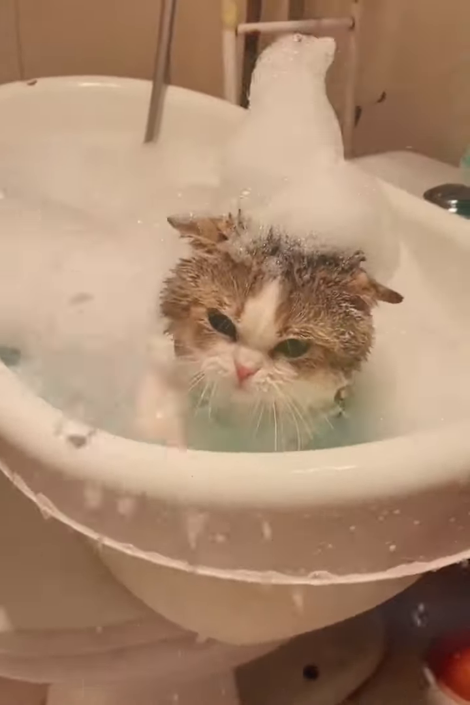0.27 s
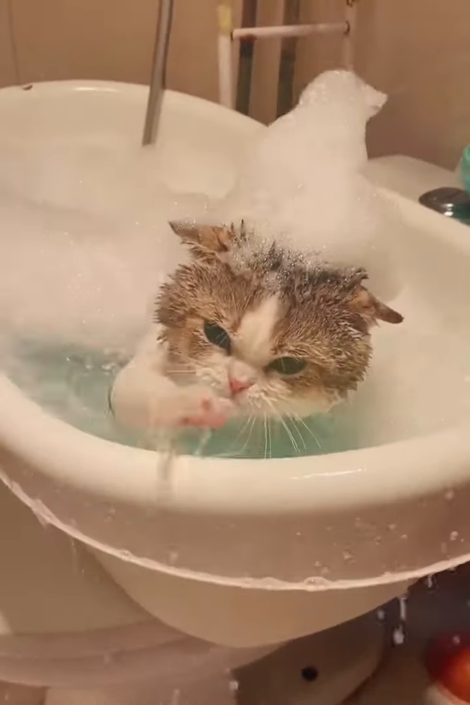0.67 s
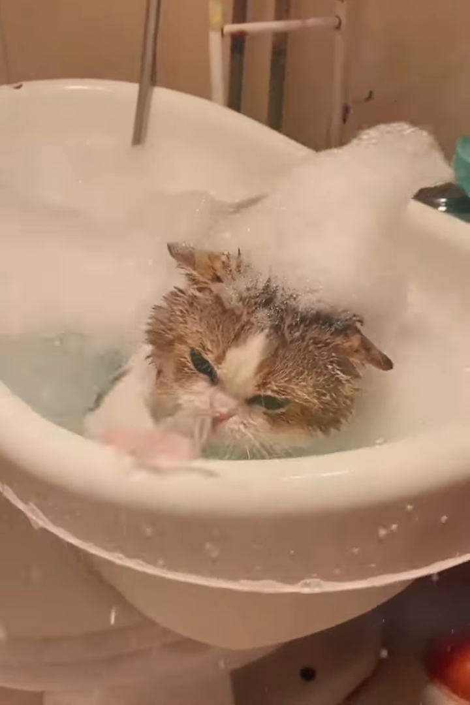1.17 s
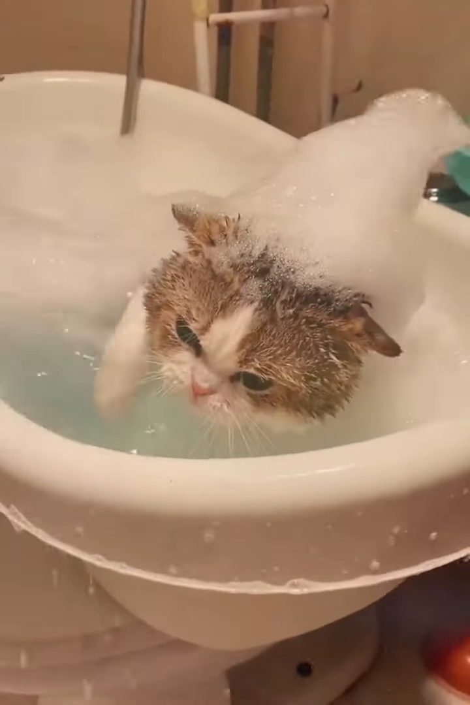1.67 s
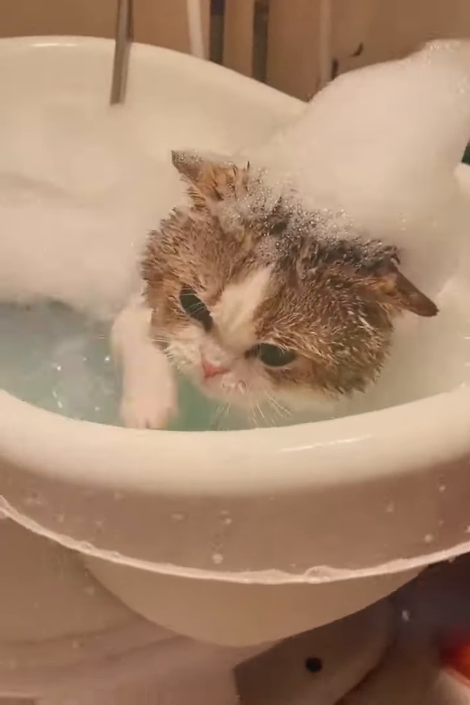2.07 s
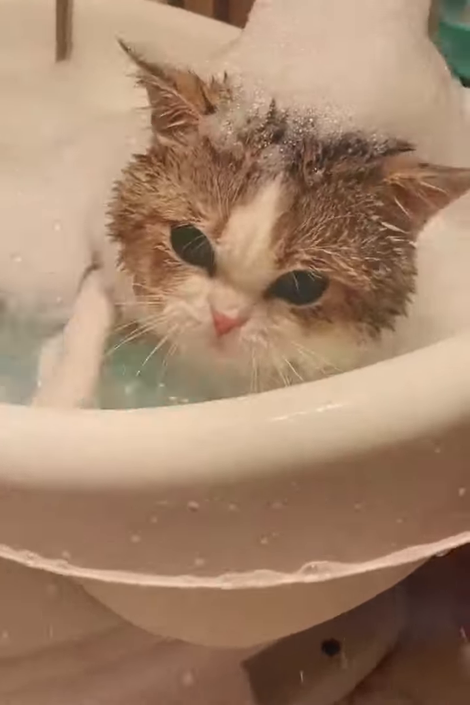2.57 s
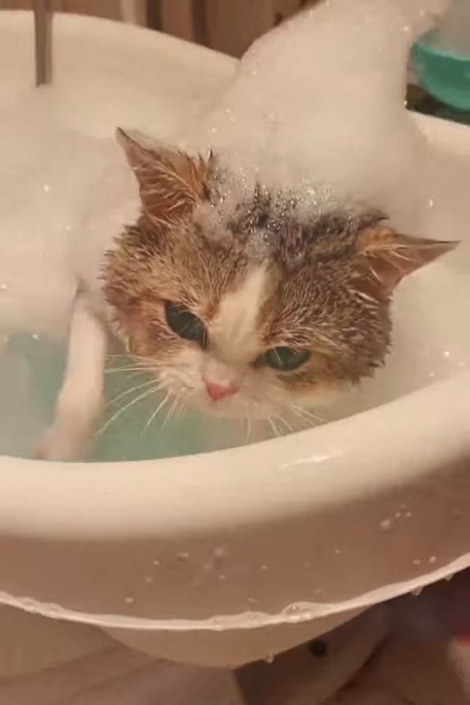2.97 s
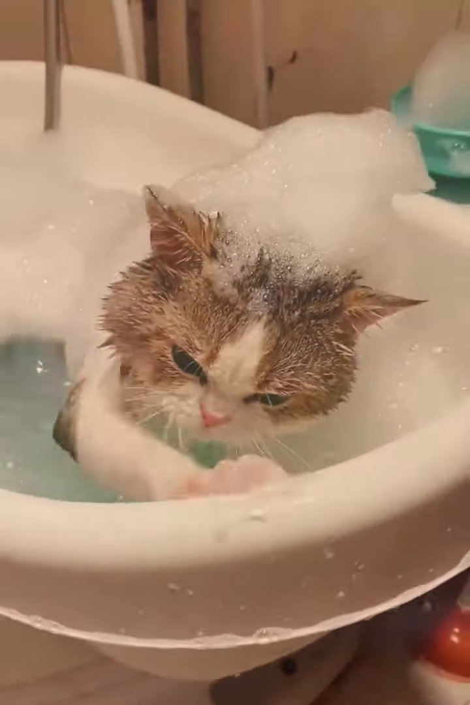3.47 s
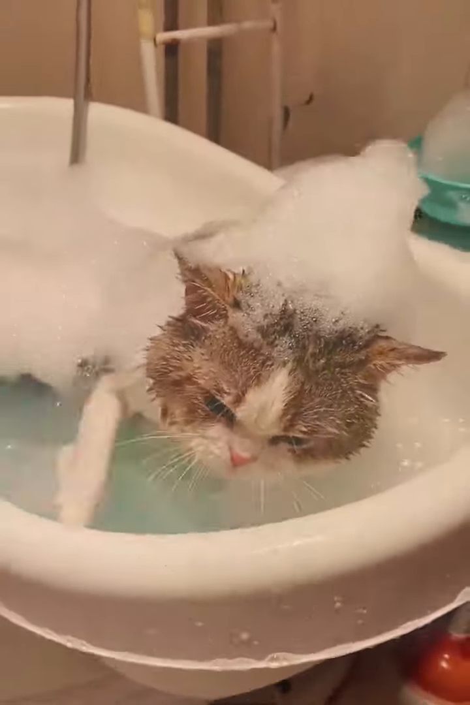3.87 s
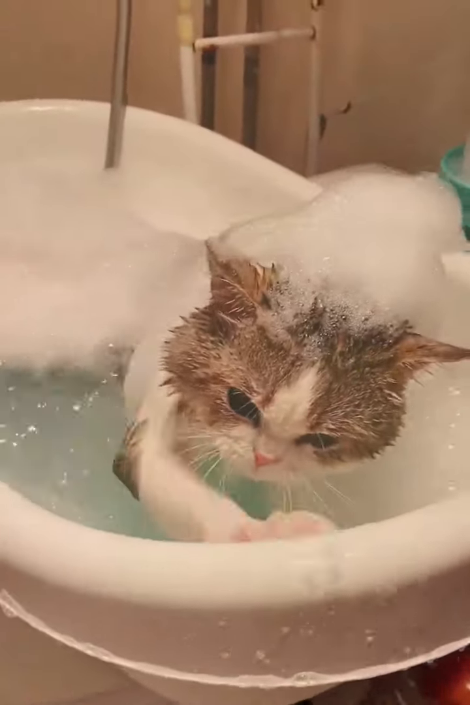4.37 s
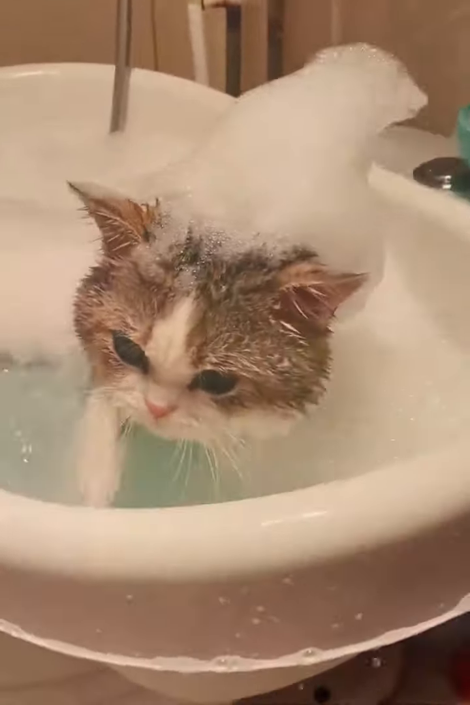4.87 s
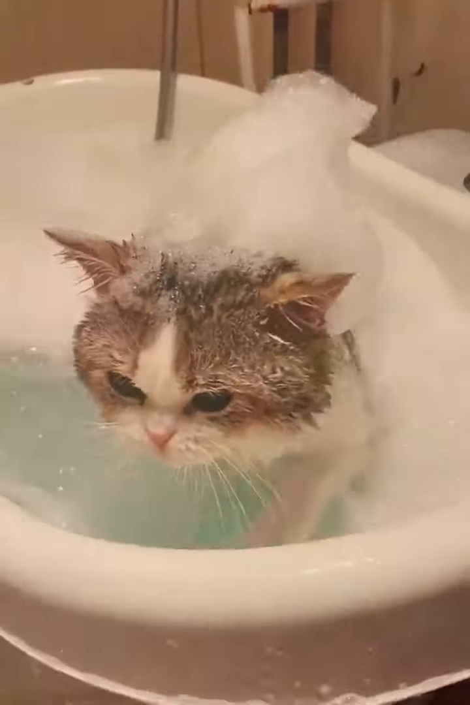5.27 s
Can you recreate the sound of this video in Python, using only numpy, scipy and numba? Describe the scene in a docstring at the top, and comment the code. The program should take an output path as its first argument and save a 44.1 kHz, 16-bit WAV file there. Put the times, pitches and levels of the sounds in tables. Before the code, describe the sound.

Close stereo phone sound of water being slapped in a basin: sharp wet pops, rounded gulps, churning small bubbles and brief hissy spray. The busiest, loudest splashing comes first, with a low thump against the wall. Gentler dabs, lapping and drips follow, then a livelier burst ends it. Short bright tile reflections and a low house hum surround it.

```python
"""A small animal paws at foamy water in a plastic basin in a tiled bathroom, a phone close by.
Hard slaps crowd the first 1.5 s, grow sparser and softer, then gather again from about 5 s.
Each slap rings trapped air, churns smaller bubbles and throws spray; surges drive the basin's modes.
Single bubbles ring, droplets tick on the rim and water laps between slaps, all over a low house hum
of shaped noise. The tiles return short decaying noise tails, partly alike in left and right."""
import sys
import numpy as np
from scipy import signal
from scipy.fft import rfft, irfft, next_fast_len
from scipy.io import wavfile
from numba import njit

SR = 44100
rng = np.random.default_rng(int(sys.argv[2]) if len(sys.argv) > 2 else 0)


def unload_audio(sound):
    """Save the sound as a 16-bit wav file, at the path given as the first command line argument."""
    columns = np.transpose(np.atleast_2d(sound))
    # keep every value between -1 and 1, then stretch to whole-number steps
    steps = np.round(np.clip(columns, -1, 1) * 32767)
    wavfile.write(sys.argv[1], SR, steps.astype(np.int16))


N = 243990
TIME = np.arange(N) / SR
FAST = next_fast_len(N)
SPOTS = 3  # places in the basin where the paw lands, each with its own echoes
FADE_S = 0.22  # base time that sets the fades of spray and bubble clusters


def undb(db):
    """Level law: 20 dB is a factor of ten in amplitude."""
    return 10 ** (np.asarray(db) / 20)


def unit(x):
    """Normalisation to unit rms."""
    return x / np.sqrt(np.mean(x ** 2))


def along(table, size):
    """Interpolation over log frequency: a (frequency [Hz], value) table read at each transform bin."""
    hz, value = np.transpose(table)
    return np.interp(np.log(np.fft.rfftfreq(size, 1 / SR) + 1), np.log(hz), value)


def coloured(x, table):
    """Spectral shaping: the spectrum is weighted by a (frequency [Hz], level [dB]) table; rms 1."""
    spectrum = rfft(x, FAST) * undb(along(table, FAST))
    return unit(irfft(spectrum, FAST)[:N])


@njit
def ring(start, hz, cycles, size, glide):
    """Bubble resonance: a swell over 1.5 cycles, a decay of 26 dB in `cycles`, and a gliding pitch."""
    out = np.zeros(N)
    for k in range(len(start)):
        span = cycles[k] * SR / hz[k]
        phase = 0.
        for i in range(min(int(2 * span), N - start[k])):
            phase += min(2 * np.pi * hz[k] * (1 + glide * i / span) / SR, 2.8)
            swell = np.sin(min(phase / 6, np.pi / 2)) ** 2
            out[start[k] + i] += size[k] * swell * np.exp(-3 * i / span) * np.sin(phase)
    return out


def swarm(per_s, lo_hz, hi_hz, cycles, scatter_db, glide):
    """Random superposition: bubbles at random times, a few loud among many faint; rms 1."""
    when, pitch, rank, length = rng.random((int(per_s * N / SR), 4)).T
    start = (when * N).astype(np.int64)
    hz = lo_hz * (hi_hz / lo_hz) ** pitch
    size = undb(-scatter_db * np.log(1 - .99 * rank))
    return unit(ring(start, hz, cycles * (.5 + length), size, glide))


def burst(s, hz, db, t60_s, cycles, spread, scatter_db, count, glide=0.067, rise_s=1e-4):
    """Decaying cluster: each blow frees bubbles of like pitch, on average ever fainter; one row a spot."""
    u = rng.standard_normal((len(s), count, 3))
    jitter = np.tanh(u[..., 0]) ** 2 * (count > 1)
    late = .5 * t60_s * (np.arange(count) + jitter) / count
    level_db = db[:, None] + scatter_db * np.clip(u[..., 1], -2, 2) - 60 * late / t60_s
    size = undb(level_db) * np.tanh((late + 0.0029) / rise_s)
    pitch = np.clip(hz[:, None] * np.exp(spread * u[..., 2]), 100, 15000)
    start = ((s[:, None] + late) * SR).astype(np.int64)
    spots = []
    for k in range(SPOTS):  # blows are dealt to the spots in turn
        here = slice(k, None, SPOTS)
        spot_hz = pitch[here].ravel()
        lengths = np.full(spot_hz.size, cycles)
        spots.append(ring(start[here].ravel(), spot_hz, lengths, size[here].ravel(), glide))
    return np.array(spots)


def stir(s, db, rise_s, t60_s):
    """Energy summation: the water's motion rises and fades after every blow, added in power."""
    power, t = np.zeros(N + SR), TIME[:SR // 2]
    shape = (1 - np.exp(-t / rise_s)) ** 2 * np.exp(-2 * np.log(1000) * t / t60_s)
    for start, level in zip((s * SR).astype(int), undb(db)):
        power[start:start + len(t)] += level ** 2 * shape
    return np.sqrt(power[:N])


# spectrum of the house hum: (frequency [Hz], relative level per Hz [dB])
HUM_SPECTRUM = [(25, -5), (45, 1.5), (72, 13.5), (100, 2), (135, 4.5), (190, -4.5), (218, -2.5), (242, 9),
                (268, 1), (320, 1.5), (380, -3.5), (525, -4), (620, -27), (900, -76), (2000, -60)]
HUM_DB = -44


def hum():
    """Stationary noise: a low house hum shaped by its spectrum."""
    return undb(HUM_DB) * coloured(rng.standard_normal(N), HUM_SPECTRUM)


# likeness of the echoes in left and right: (frequency [Hz], likeness [0-1])
ECHO_LIKENESS = [(150, 0.52), (300, 0.81), (600, 0.0051), (3000, 0.0078), (5500, 0.057), (7500, 1),
                 (10000, 0.73), (16000, 1)]
ROOM_T60_S, ROOM_TREBLE_T60_S = 0.15, 0.2
ROOM_GAP_S, ROOM_DB = 0.0007, 1.5  # build-up time of the tail; its relative level


def echoes(size):
    """Diffuse reverberation: noise tails off the tiles, the treble lasting longer, partly coherent."""
    t = TIME[:int(.4 * SR)]
    noise = rng.standard_normal((3, len(t)))
    dull = signal.sosfilt(signal.butter(2, 4000, fs=SR, output="sos"), noise)
    fade = np.exp(-np.log(1000) * t / ROOM_T60_S)
    treble_fade = np.exp(-np.log(1000) * t / ROOM_TREBLE_T60_S)
    grow = 1 - np.exp(-(t / ROOM_GAP_S) ** 2)
    tail = (dull * fade + (noise - dull) * treble_fade) * grow
    tails = rfft(tail * undb(ROOM_DB) / np.sqrt(np.sum(fade ** 2)), size)
    like = np.clip(along(ECHO_LIKENESS, size), 0, 1)
    return np.sqrt(like) * tails[0] + np.sqrt(1 - like) * tails[1:]  # shared part, own parts


# the water keeps moving after a slap: level against its churn and its spray; rise and t60
AFTERWASH_DB, AFTERSPRAY_DB, AFTERWASH_RISE_S, AFTERWASH_S = -12, -8.5, 0.018, 0.27
LAP_GULP_DB = -2  # large lapping bubbles against the small
# lapping between slaps: (time [s], bubble level [dB], spray level [dB])
LAPPING_LEVELS = [(0.0, -26, -27.5), (0.08, -46, -39.5), (0.31, -32, -34.5), (0.6, -38.5, -45.5),
                  (0.76, -54, -42), (0.98, -40, -34), (1.26, -34, -37.5), (1.499, -45.5, -39.5),
                  (1.86, -49.5, -49), (2.15, -50, -49), (2.54, -42.5, -47.5), (2.82, -53, -51),
                  (3.15, -52, -45.5), (3.5, -46.5, -47), (3.8, -46, -45.5), (4.001, -47.5, -48.5),
                  (4.4, -48, -49), (4.6, -41.5, -48), (4.73, -50.5, -45.5), (4.98, -47.5, -47),
                  (5.1, -36.5, -36), (5.19, -34, -43), (5.301, -47, -47), (5.53, -31.5, -36.5)]


def lapping():
    """Bubble superposition: large and small swarms follow the lapping and the wash after each slap."""
    when, bubbles_db, _ = np.transpose(LAPPING_LEVELS)
    s, churn_db = np.transpose(SLAP_EVENTS)[[0, 5]]
    between = undb(np.interp(TIME, when, bubbles_db))
    after = stir(s, churn_db + AFTERWASH_DB, AFTERWASH_RISE_S, AFTERWASH_S)
    large = undb(LAP_GULP_DB) * swarm(300, 266.5, 613.0, 2.4, 0.65, 0.26)
    small = swarm(1500, 726.0, 4830.0, 6.2, 4.0, 0.15)
    return np.hypot(between, after) * (large + small)


# spectrum of the spray: (frequency [Hz], relative level per Hz [dB])
SPRAY_SPECTRUM = [(600, -24), (2000, 6), (3200, -4), (5000, -1), (7500, -3), (11000, -2.5), (14000, -4),
                  (15600, -9), (17000, 0)]


def spray():
    """Many-droplet limit: fine droplets merge into hiss; larger ones crackle over it."""
    when, _, spray_db = np.transpose(LAPPING_LEVELS)
    s, thrown_db = np.transpose(SLAP_EVENTS)[[0, 8]]
    between = undb(np.interp(TIME, when, spray_db))
    after = stir(s, thrown_db + AFTERSPRAY_DB, AFTERWASH_RISE_S, AFTERWASH_S)
    thrown = stir(s, thrown_db, 0.00022, 0.57 * FADE_S)
    crackle = 0.75 * swarm(700, 2980.0, 13300.0, 1.73, 4.3, 0.24)
    drops = rng.standard_normal(N) + crackle
    hiss = coloured(drops, [(20, -60)] + list(SPRAY_SPECTRUM))
    return hiss * np.hypot(thrown, np.hypot(between, after))


UPPER_FROM_HZ = 150
# the wave front hits the wall once, then rumbles against it
SLAM_DB, SLAM_LAG_S, RUMBLE_DB = 28, 0.00994, -6.5
# modes of the plastic basin: (frequency [Hz], width [Hz], relative level [dB])
BASIN_MODES = [(70, 27, -11), (136.6, 12.6, 4.5), (158.6, 18.5, 0), (239, 31, -5)]
# surges against the basin wall: (time [s], relative level [dB], lift of the upper modes [dB])
WALL_SURGES = [(0.077, -30.5, 2), (0.155, -10, 0), (0.384, -22.5, 2.5), (0.544, -36.5, -5),
               (0.801, -28.5, 3), (0.945, -36, 2.5), (1.045, -28.5, -6), (1.283, -23.5, 7.5),
               (1.614, -38.5, 2), (2.01, -32, -3), (2.46, -44, 8), (2.65, -36.5, 0), (3.02, -30.5, -8),
               (3.348, -31, -4), (3.67, -29, -4), (3.95, -30, -2), (4.26, -31.5, -4), (4.56, -36.5, 1),
               (4.872, -28.5, -3), (5.04, -28, 6), (5.29, -34, -3), (5.37, -36, 3), (5.451, -35, 1)]


def basin():
    """Modal resonance: each surge drives the wall; where the wave lands sets the balance of modes."""
    s, db, lift_db = np.transpose(WALL_SURGES)
    hz, noise = np.fft.rfftfreq(FAST, 1 / SR), rng.standard_normal(N)
    slam_at = ((s + SLAM_LAG_S) * SR).astype(int)
    boom, response = 0, 0
    for mode_hz, width_hz, gain_db in BASIN_MODES:
        mode = undb(gain_db) / (1 + 2j * (hz - mode_hz) / width_hz) ** 2
        blow_db = db + lift_db * (mode_hz > UPPER_FROM_HZ)
        push = noise * stir(s, blow_db + RUMBLE_DB, 0.0166, 0.41)
        push[slam_at] += undb(blow_db + SLAM_DB)
        boom = boom + rfft(push, FAST) * mode
        response = response + mode
    return irfft(boom, FAST)[:N] / np.sqrt(np.mean(np.abs(response) ** 2))


TICK_SHARD_DB = 2.5  # each shard of a droplet against the whole
TICK_ECHO_DB = -4  # the rim is close to the phone
# droplets that tick on the rim: (time [s], relative level [dB], frequency [Hz])
RIM_TICKS = [(0.055, -2, 9400), (0.127, 5, 7500), (0.189, 7, 8400), (0.5651, -9, 9500), (0.637, -5, 8600),
             (0.715, -3, 12600), (1.206, -3, 12500), (1.273, -3, 12000), (1.4074, -3, 6760),
             (1.548, -4, 6940), (1.5855, -6, 10000), (1.6591, 1, 10000), (1.6771, 9, 7060),
             (1.8885, 4, 11500), (1.9848, -2, 6900), (2.221, -12, 11000), (2.29, -10, 10000),
             (2.49, -3, 11200), (2.5537, -10, 6200), (2.5552, -4.5, 10900), (2.629, -3, 11000),
             (2.966, -11, 8900), (3.238, -0.5, 10400), (3.3251, 3, 9100), (3.561, -5, 11600),
             (3.644, 1, 7000), (3.826, -5, 9500), (3.946, -6, 9100), (4.258, 0, 8900), (4.479, -10, 12100),
             (4.56, 0, 8700), (5.032, -5, 10000), (5.346, 2.5, 12000), (5.479, -3.5, 9800)]


def ticks():
    """Impact break-up: each droplet lands on the rim as four short shards."""
    s, db, hz = np.transpose(RIM_TICKS)
    return burst(s, hz, db + TICK_SHARD_DB, 0.006, 4.0, 0.15, 3.6, count=4)


# single bubbles, within slaps and between them:
# (time [s], frequency [Hz], relative level [dB], decay by 26 dB [cycles])
SINGLE_BUBBLES = [(0.113, 1450, -18, 7.2), (0.123, 1380, -15, 14), (0.141, 1400, -20, 7.2),
                  (0.166, 338, -6, 4.2), (0.281, 1450, -17, 6), (0.31, 1020, -17.5, 15),
                  (0.339, 710, -17, 5), (0.372, 543, -8, 12), (0.377, 2780, -13, 11), (0.42, 566, -19, 14),
                  (0.44, 695, -22, 6.6), (0.806, 1010, -21, 8.9), (0.811, 477, -18.5, 9.8),
                  (0.888, 1160, -12, 9.4), (0.919, 330, -27, 16), (0.976, 2190, -18, 8.7),
                  (1.009, 1810, -30, 8), (1.292, 356, -8, 6.3), (1.296, 730, -9, 16), (1.303, 340, -9, 6),
                  (1.316, 640, -11, 6), (1.309, 448, -6, 8.2), (1.325, 940, -9, 7.3), (1.339, 446, -9, 4.4),
                  (1.341, 1480, -16, 11), (1.362, 385, -13, 5.5), (1.378, 750, -14, 8),
                  (1.415, 430, -13.5, 4.3), (1.727, 4900, -17, 10), (2.03, 2210, -22, 15),
                  (2.052, 2050, -21, 12), (2.075, 2120, -25, 15), (2.134, 2690, -27.5, 9.6),
                  (2.216, 1650, -22, 8.1), (2.324, 1880, -22, 38), (2.457, 770, -9, 7.6),
                  (2.46, 260, -15.5, 5.6), (2.459, 420, -22, 3.7), (2.622, 2310, -24, 8.7),
                  (2.791, 2680, -31, 12), (2.806, 4760, -36, 53), (2.816, 4730, -34, 72),
                  (2.9, 1900, -30, 6.6), (2.913, 5050, -41, 36), (2.965, 3060, -22, 7.4),
                  (3.222, 1720, -22, 8), (3.327, 1600, -15, 8), (3.332, 974, -17.5, 12),
                  (3.466, 514, -24, 7.2), (3.481, 495, -26, 7.7), (3.488, 1070, -28, 8.8),
                  (3.496, 1250, -29, 8), (3.495, 486, -30, 11), (3.562, 1060, -27, 8),
                  (3.574, 404, -26, 4.5), (3.59, 2630, -26, 27), (3.65, 1120, -17, 10),
                  (3.656, 2920, -15.5, 22), (3.805, 1880, -26, 5.6), (3.856, 1770, -27, 8),
                  (3.883, 2830, -21, 11), (4.082, 3290, -33, 27), (4.089, 2200, -19, 4),
                  (4.101, 1190, -27, 12), (4.14, 1400, -23, 6), (4.171, 2500, -18, 7.3),
                  (4.196, 731, -26.5, 39), (4.223, 1300, -19, 6.3), (4.228, 760, -28, 17),
                  (4.258, 1700, -18, 7.2), (4.263, 1210, -23, 12), (4.256, 2800, -19, 10),
                  (4.41, 2040, -32, 8), (4.431, 2500, -28, 8.7), (4.466, 2510, -26, 8),
                  (4.564, 1065, -20.5, 14), (4.574, 1080, -23, 12), (4.653, 2350, -25.5, 12),
                  (4.701, 2100, -24.5, 7.8), (4.719, 1170, -36, 18), (4.783, 1080, -28, 8.8),
                  (4.797, 1780, -30, 9), (4.851, 450, -20, 4.1), (4.996, 1600, -34, 8),
                  (5.038, 700, -9, 4.2), (5.058, 500, -27, 4.7), (5.076, 1280, -17, 8),
                  (5.135, 1088, -23.5, 27), (5.176, 2010, -16, 8), (5.211, 970, -6, 4.5),
                  (5.225, 2270, -17.5, 30), (5.351, 1280, -8.5, 13), (5.342, 460, -15, 6.9),
                  (5.358, 1960, -8.5, 17), (5.362, 2930, -6.5, 13), (5.377, 490, -12.5, 7.5)]


def drips():
    """Free bubble oscillation: single bubbles, each with its own pitch and ring, rising as they fade."""
    s, hz, db, cycles = np.transpose(SINGLE_BUBBLES)
    return ring((s * SR).astype(np.int64), hz, cycles, undb(db), 0.067)


CLUSTER_RISE_S = 0.0044  # a cluster swells before it fades
CHURN_TOP_HZ = 2640  # churned bubbles match the pop in size, but their centre pitch stops here


def bubbles():
    """Size and pitch: clusters of gulps, churn and fizz, dealt in turn to the landing spots."""
    s, _, pop_hz, gulp_hz, gulp_db, churn_db, fizz_hz, fizz_db, _ = np.transpose(SLAP_EVENTS)
    churn_hz = np.minimum(pop_hz, CHURN_TOP_HZ)
    t60_s, rise_s = 1.1 * FADE_S, CLUSTER_RISE_S
    gulps = burst(s, gulp_hz, gulp_db, t60_s, 6.0, 0.15, 2.8, count=16, rise_s=rise_s)
    churn = burst(s, churn_hz, churn_db, t60_s, 6.67, 0.4185, 3.2, count=70, rise_s=rise_s)
    fizz = burst(s, fizz_hz, fizz_db, t60_s, 9.3, 0.13, 2.5, count=70, rise_s=rise_s)
    return gulps + churn + fizz


POP_GLIDE = -0.069  # the pocket opens as it rings, so the pop falls in pitch
PLOP_OVER_GULP_DB = 0.5  # the first large pocket against the cluster that follows
PLOP_FOLLOWS_POP = 0.23  # share by which a harder pop also lifts the first large pocket
CRACK_DB, CRACK_T60_S = -5.5, 0.0084  # the film tears: blunt clicks against the pop
# slaps: (time [s], pop level [dB], pop frequency [Hz], gulp frequency [Hz], gulp level [dB],
# churn level [dB], fizz frequency [Hz], fizz level [dB], spray level [dB]); levels are relative
SLAP_EVENTS = [(0.094, 3.5, 1310, 444, -9.5, -43, 2800, -15, -37),
               (0.129, -5, 5600, 485, -11, -13.5, 5770, -9.5, -19),
               (0.164, -17, 1660, 333, -13, -9.5, 3240, -11.5, -21),
               (0.169, 2.5, 1720, 299, -14, -11.5, 3110, -13, -18.5),
               (0.279, -32, 1650, 460, -44, -35, 3210, -44, -24),
               (0.36, -16, 1050, 512, -6, -19, 3180, -22, -27),
               (0.397, -0.5, 1170, 507, -21, -13, 4800, -18, -22),
               (0.407, 0, 2430, 510, -13, -15, 3170, -33, -36),
               (0.566, -15, 2240, 497, -29, -22.5, 3320, -23.5, -24),
               (0.71, -49, 6140, 470, -27, -32, 6050, -26.5, -36),
               (0.795, -31, 1177, 490, -24, -18.5, 4000, -23, -24.5),
               (0.874, -30, 1300, 305, -26, -23, 3330, -17.5, -26),
               (0.882, -5, 2390, 437, -24, -19.5, 5500, -17.5, -23),
               (0.905, -22, 2040, 350, -20, -47, 3850, -27, -34),
               (1.043, 1, 2410, 280, -49, -15, 5550, -15, -22),
               (1.214, -17, 1370, 684, -20.5, -43, 3540, -27, -28),
               (1.278, -18, 990, 477, -8, -22, 4790, -38, -33),
               (1.29, -6, 1784, 458, -3.5, -10, 3000, -26, -22.5),
               (1.346, -3.5, 1900, 440, -8, -14.5, 3800, -26, -25),
               (1.407, 1, 5140, 322, -23, -44, 5000, -19, -24),
               (1.506, -6, 7000, 300, -39, -27, 3320, -28, -39),
               (1.585, -19.5, 1200, 460, -22, -28, 4600, -27.5, -32),
               (1.659, -40, 6000, 345, -43, -50, 11000, -14, -33),
               (1.676, -9.5, 2640, 340, -37, -22, 5400, -21, -31),
               (1.823, -15, 6270, 272, -48, -56, 6200, -25.5, -52),
               (1.89, -15.5, 1020, 476, -20.5, -46, 5200, -24, -31.5),
               (1.929, -33, 910, 540, -27.5, -28, 5940, -28, -34.5),
               (1.988, -2, 2170, 716, -35, -23.5, 5140, -17.5, -21),
               (2.173, -17.5, 1800, 283, -52, -36, 3470, -34.5, -60),
               (2.287, -33, 3020, 885, -27, -31, 2830, -26, -33),
               (2.309, -12, 1880, 285, -41, -27.5, 5500, -23.5, -29.5),
               (2.456, 1, 2140, 740, -27, -23.5, 5150, -28, -29),
               (2.458, -9.5, 730, 258, -26, -35, 3020, -43, -53),
               (2.553, -36, 1000, 266, -31, -32.5, 6130, -44, -37),
               (2.631, -20, 5700, 456, -31, -18.5, 5670, -43, -32.5),
               (2.644, -16, 1090, 497, -36, -29.5, 4900, -31, -26),
               (2.809, -26, 2150, 422, -35, -58, 4800, -45, -43),
               (2.945, -25, 1090, 304, -48, -35, 2870, -33, -38.5),
               (2.99, -2.5, 1930, 1020, -17.5, -20.5, 4370, -10, -26.5),
               (3.2, -22.5, 2170, 270, -43, -43, 4170, -49, -50),
               (3.239, -21, 1160, 300, -61, -28.5, 3600, -29.5, -35),
               (3.321, -34, 1277, 484, -25, -21, 3260, -22.5, -23.5),
               (3.442, -19.5, 1340, 333, -44, -34, 3050, -51, -58),
               (3.488, -27, 1160, 465, -37, -48, 3440, -41, -61),
               (3.553, -16.5, 1500, 473, -44, -27, 4830, -51, -30.5),
               (3.646, -19, 1950, 440, -27, -28, 4030, -18.5, -24.5),
               (3.824, -35, 5070, 540, -36, -40, 5230, -29, -37.5),
               (3.871, -18, 1390, 267, -33, -27, 4020, -27.5, -30),
               (3.946, -8, 2500, 860, -16, -22, 5030, -20.5, -25.5),
               (4.09, -20.5, 1210, 482, -45, -41, 3140, -45, -57),
               (4.155, -16, 1180, 332, -58, -37, 2910, -40, -36.5),
               (4.194, -19, 2020, 745, -41, -23.5, 3000, -44, -33.5),
               (4.258, -31, 1180, 290, -32, -28, 4100, -26, -24),
               (4.478, -27, 2350, 280, -36, -29, 5300, -25.5, -33),
               (4.498, -16, 2920, 657, -23, -32, 3530, -30, -39),
               (4.566, -11, 2140, 444, -35, -25.5, 5000, -24, -28.5),
               (4.792, -17, 1270, 700, -22, -25, 5070, -40, -32),
               (4.879, -10.5, 3360, 404, -26.5, -26, 3650, -38, -27.5),
               (5.013, -34, 1220, 575, -26, -23.5, 3280, -46, -60),
               (5.037, -8, 2750, 420, -18, -21, 3170, -23, -22),
               (5.099, -10.5, 1120, 930, -27, -24.5, 5400, -22, -29),
               (5.209, -5, 2080, 700, -18.5, -15, 3730, -18.5, -27.5),
               (5.319, -1, 1520, 464, -44, -27, 3440, -26, -44),
               (5.344, -26, 1206, 447, -11.5, -15.5, 5050, -19.5, -27),
               (5.362, -4, 2030, 510, -23, -13, 2950, -24, -22),
               (5.521, -16, 1350, 527, -26, -22, 4050, -37, -28)]


def pops():
    """Cavity resonance: the paw breaks the surface and a small and a large air pocket ring at once."""
    s, pop_db, pop_hz, gulp_hz, gulp_db = np.transpose(SLAP_EVENTS)[:5]
    start_hz = pop_hz * (1 - POP_GLIDE / 4)
    plop_db = gulp_db + PLOP_OVER_GULP_DB + PLOP_FOLLOWS_POP * (pop_db - gulp_db)
    small = burst(s, start_hz, pop_db, FADE_S, 6.0, 0.0098, 1.0, count=1, glide=POP_GLIDE)
    large = burst(s, gulp_hz, plop_db, FADE_S, 5.5, 0.0082, 0.65, count=1)
    crack = burst(s, pop_hz, pop_db + CRACK_DB, CRACK_T60_S, 1.8, 0.56, 2.7, count=4)
    return small + large + crack


# direct sound of each landing spot: (left over right [dB])
SPOT_BALANCE_DB = [0, 0, 4.5]
# stereo phase: (frequency [Hz], left leads by [rad])
STEREO_PHASE = [(300, 0), (5200, .7), (7000, 3.0), (8400, 3.25), (10300, 6.2), (12000, 6.4), (13200, 9.3),
                (16000, 9.5)]


def scene():
    """Linear superposition: direct sound and echoes of every spot, over the hum and the basin."""
    size = next_fast_len(N + SR // 2)
    surface, under = pops(), bubbles()
    under[0] += lapping() + spray()
    surface[1] += drips()
    heard = rfft(hum() + basin(), size)
    for near, far, rim, pan_db in zip(surface, under, ticks(), SPOT_BALANCE_DB):
        side = undb(np.array([[pan_db], [-pan_db]]) / 2)
        direct = side * rfft(near + far + rim, size)
        to_tiles = undb(0.5) * near + far + undb(TICK_ECHO_DB) * rim
        reflected = rfft(to_tiles, size) * echoes(size)
        heard = heard + (direct + reflected) * undb(-3.5)
    turn = np.exp(.5j * along(STEREO_PHASE, size))  # half the phase on each channel
    return irfft(heard * np.array([turn, 1 / turn]), size)[:, :N]


def record(dry):
    """Band limiting: the phone drops the deepest bass and cuts the top above 16 kHz."""
    thin = signal.sosfilt(signal.butter(2, 48., "high", fs=SR, output="sos"), dry)
    return signal.sosfilt(signal.ellip(10, .2, 70, 16000, fs=SR, output="sos"), thin)


dry = scene()
out = record(dry)
unload_audio(out)
```